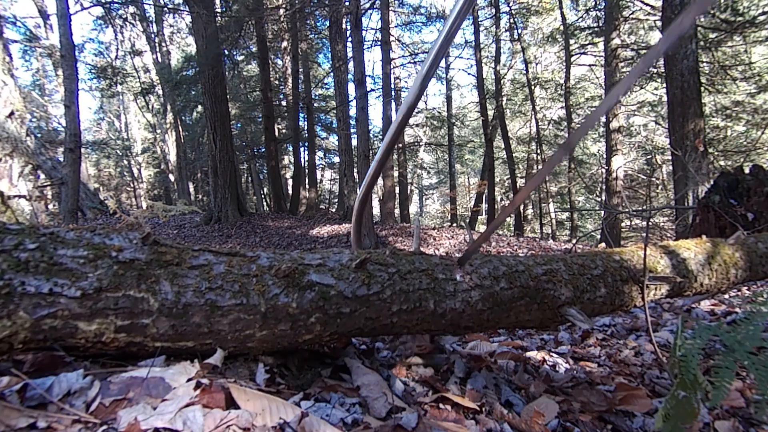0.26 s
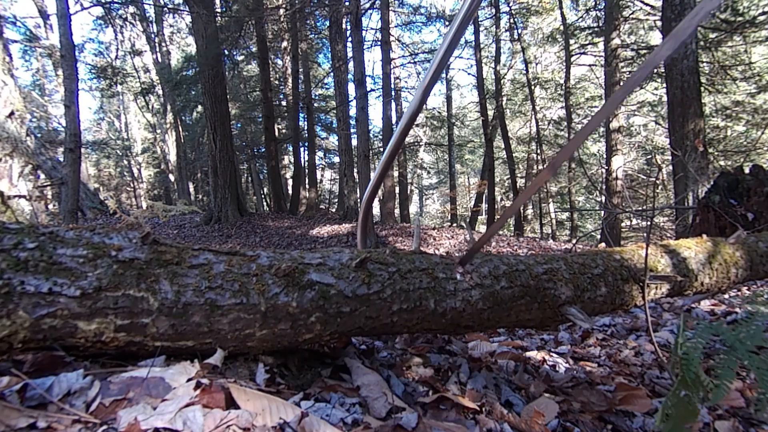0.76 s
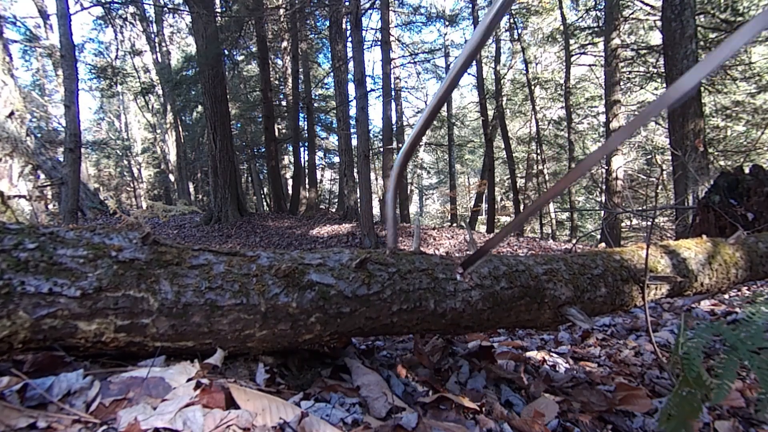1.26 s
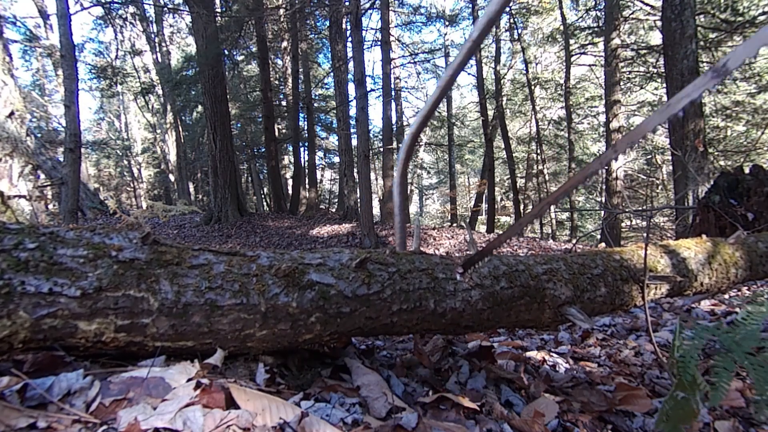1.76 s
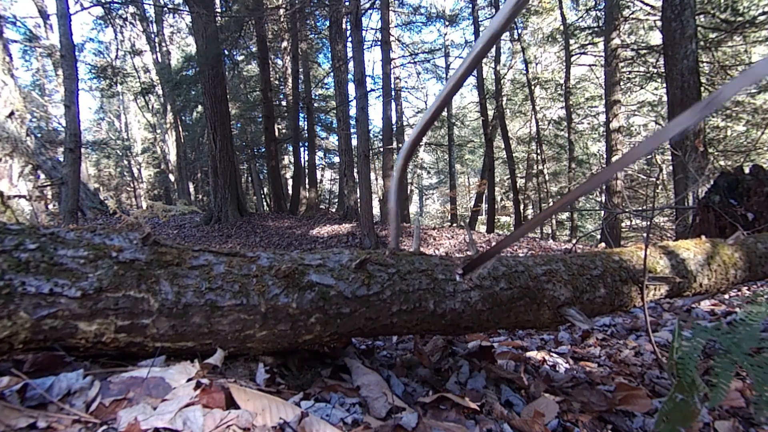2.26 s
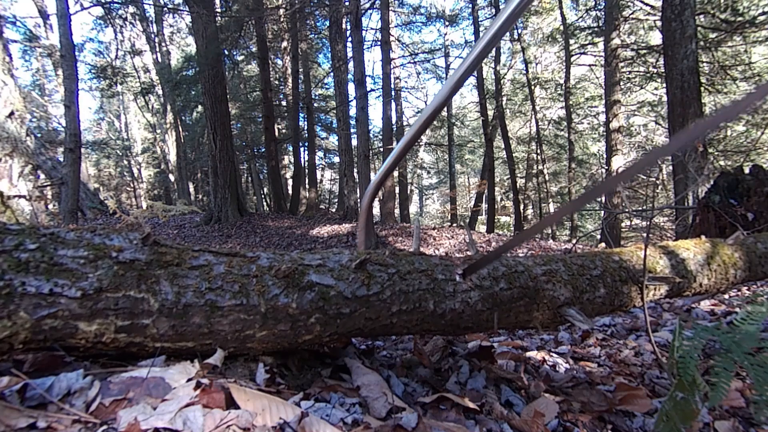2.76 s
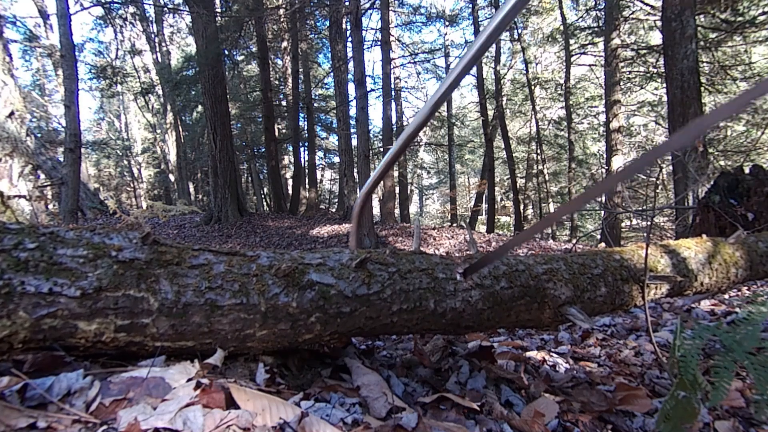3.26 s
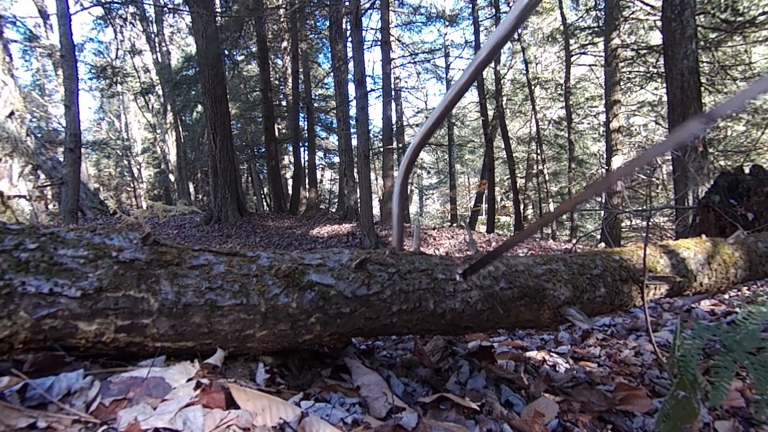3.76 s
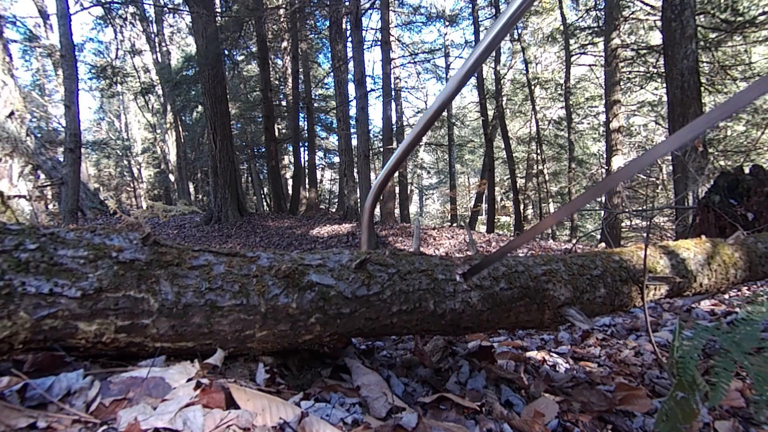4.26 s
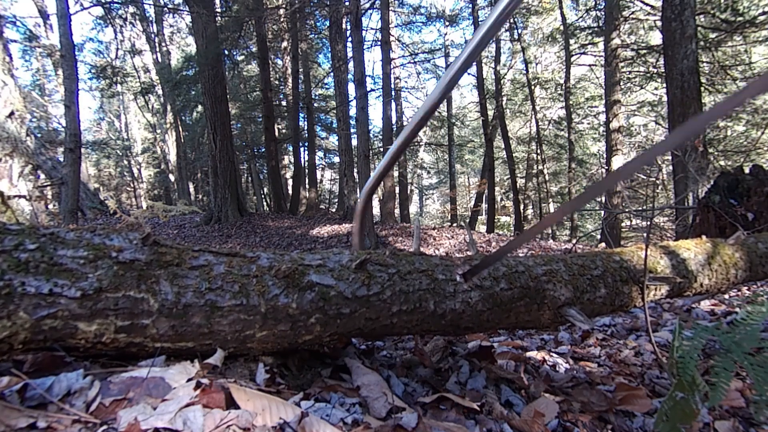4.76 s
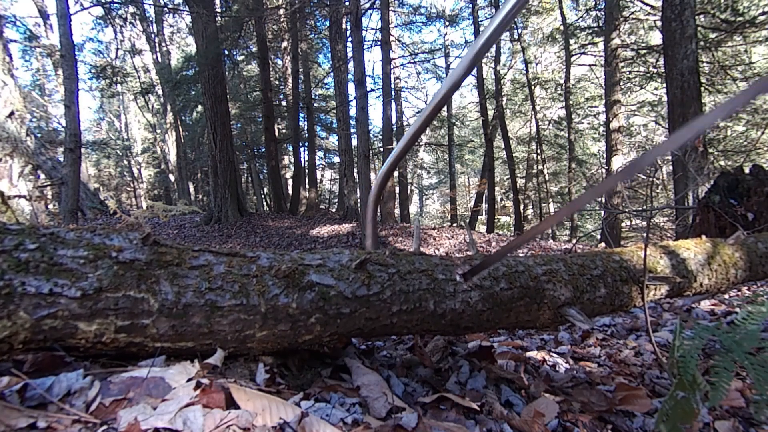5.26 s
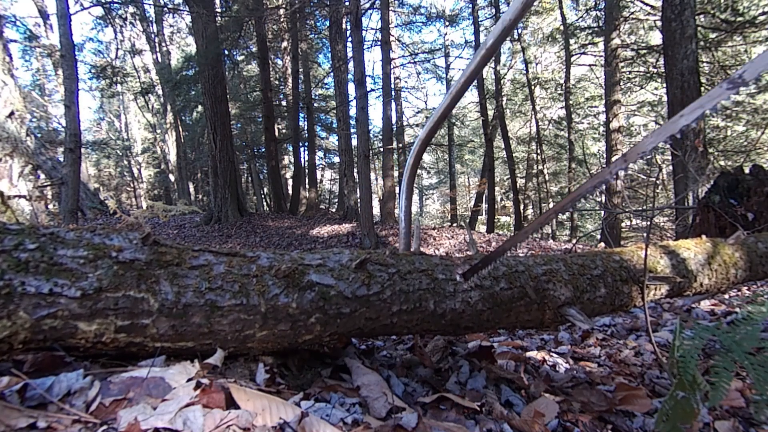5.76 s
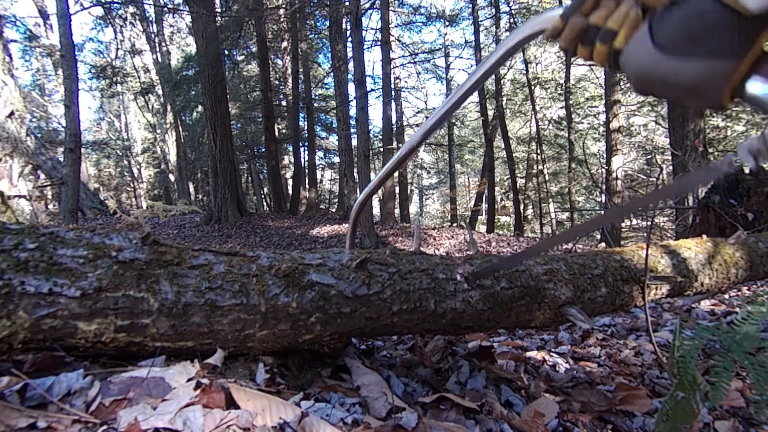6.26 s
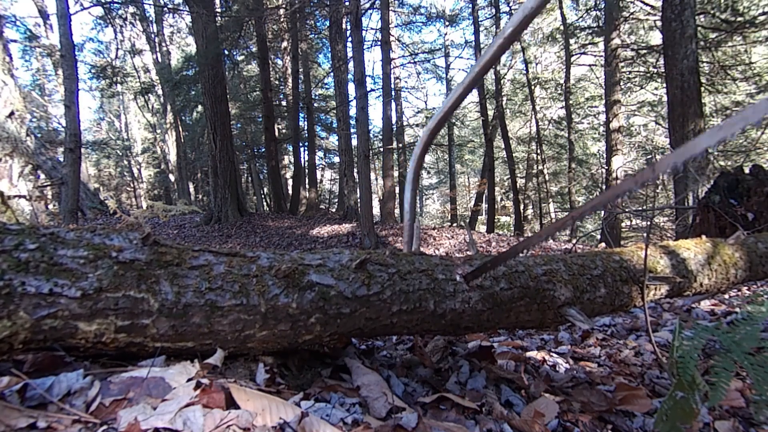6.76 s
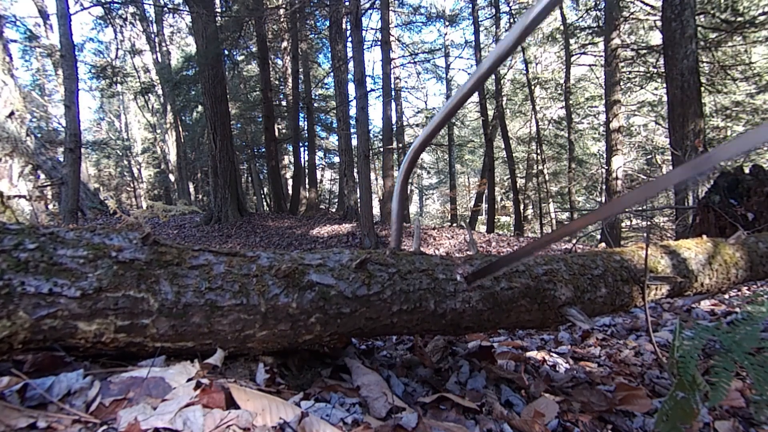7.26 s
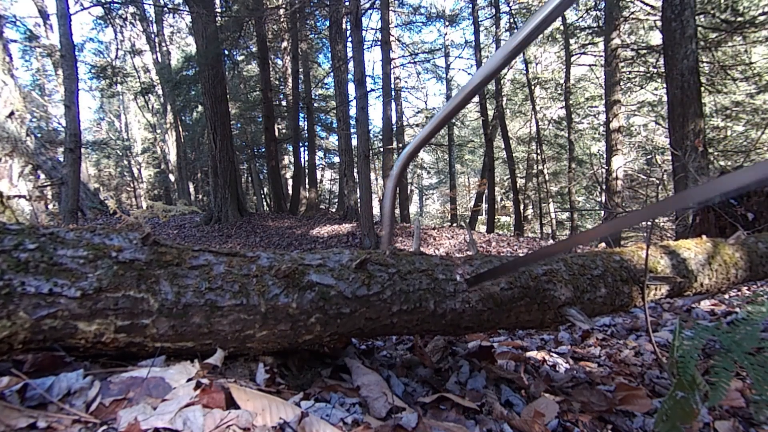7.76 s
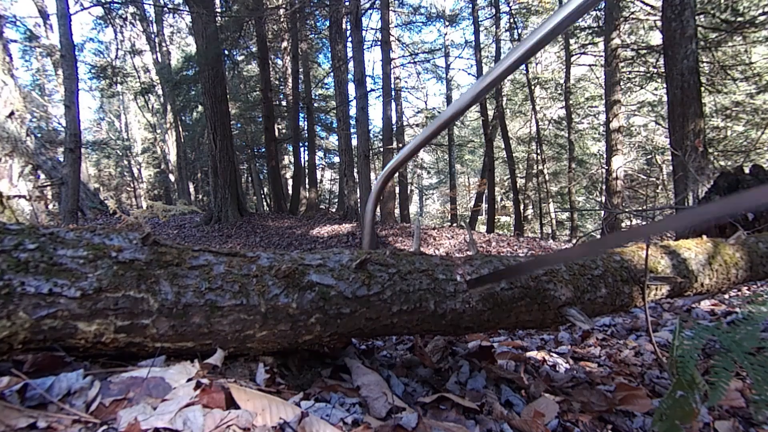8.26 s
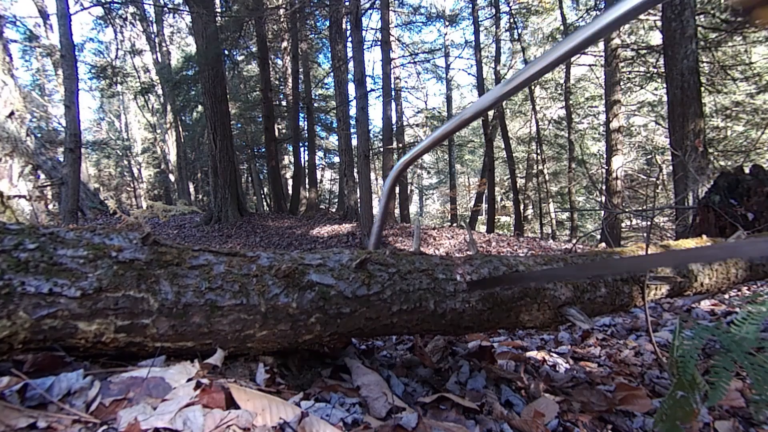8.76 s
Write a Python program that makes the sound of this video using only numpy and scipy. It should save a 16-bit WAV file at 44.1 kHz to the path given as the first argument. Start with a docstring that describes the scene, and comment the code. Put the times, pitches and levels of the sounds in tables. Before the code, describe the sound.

Very close to the microphone, a bow saw cuts a dead log in a quiet forest. Scratchy, uneven strokes come first, then a quick, forceful burst, then mostly longer rasping strokes, ending on a weak short one. The thin blade sizzles and rings, fibres snap, splinters crack, and the log thuds softly on the ground. Far leaves hiss faintly throughout.

```python
"""A bow saw cuts a dead log in a quiet forest, close by; far leaves hiss throughout, with faint tree echoes.
It opens full and scratchy with uneven strokes, turns quick and forceful from about 2 to 4 s, then mostly longer
strokes follow, some still strong, with three faint tooth hums, and a weak short one ends it. In each stroke
dense random grains tear the wood and make the thin steel blade sizzle, while tuned resonators let it ring;
decaying bursts snap fibres, sharp pulses crack splinters, and swells of low noise thud the log on the ground."""
import sys
import numpy as np
from scipy import signal
from scipy.fft import rfft, irfft, next_fast_len
from scipy.io import wavfile
from scipy.ndimage import uniform_filter1d, map_coordinates

SR = 44100
rng = np.random.default_rng(int(sys.argv[2]) if len(sys.argv) > 2 else 0)


def wav_out(sig):
    """Save sig, one row per channel (or a flat mono array), as 16-bit PCM at SR to the path in sys.argv[1]."""
    wavfile.write(sys.argv[1], SR, np.round(np.clip(np.atleast_2d(sig).T, -1, 1) * 32767).astype(np.int16))


def linear_from_db(decibels):
    """Turn decibels (scalar or array-like) into linear amplitude factors; 0 gives 1."""
    return 10 ** (np.asarray(decibels, float) / 20)


N = 397782  # length in samples, about 9 s

# Colour of the far leaves and air. Each row: frequency in Hz, relative level in dB per Hz.
FOREST_COLOUR = [(20, -2.5), (60, -3.5), (140, -8.5), (250, -9), (500, -10.5), (1000, -10), (1600, -16.5),
                 (2600, -6.5), (4000, -6), (6700, -31), (10300, -22), (15500, -44)]
FOREST_DB = -63.5  # middle level of the forest

# Tree trunks answer the saw. Each row: frequency in Hz, time to die by 60 dB in seconds.
TRUNK_DECAYS = [(500, 0.078), (3000, 0.17), (12000, 0.16)]

# The log thuds on the ground; each swell is at half its height at both ends.
# Each row: start in seconds, length in seconds, peak gain in dB.
LOG_THUDS = [(0.119, 0.21, -64), (0.656, 0.061, -57), (0.952, 0.039, -66), (1.055, 0.17, -65),
             (1.346, 0.042, -61), (1.55, 0.034, -65), (2.412, 0.026, -57), (2.821, 0.037, -65),
             (2.996, 0.106, -66), (3.205, 0.044, -58), (3.357, 0.025, -63), (3.55, 0.066, -61),
             (3.754, 0.09, -59), (4.14, 0.054, -64), (4.24, 0.17, -65), (4.816, 0.08, -65),
             (5.375, 0.069, -58.5), (6.099, 0.034, -68), (7.564, 0.06, -65), (7.791, 0.03, -67),
             (8.214, 0.083, -57), (8.436, 0.038, -65), (8.601, 0.032, -61)]
# Colour of the low shudder. Each row: frequency in Hz, relative level in dB per Hz.
GROUND_COLOUR = [(15, -36), (25, -16.5), (81, 1.5), (98, 1), (124, -19.5), (140, -11.5), (180, -33),
                 (310, -120)]
# Colour of the hollow knocking. Each row: frequency in Hz, relative level in dB per Hz.
HOLLOW_COLOUR = [(90, -48.5), (140, -1), (190, -4.5), (260, -9.5), (400, -32)]
SHUDDER_DB, KNOCK_DB = -73.5, -76  # middle levels of the constant trembling and knocking
KNOCK_UNDER_THUD_DB = -13.5  # knocking in each thud, against its shudder

# Passing teeth hum faintly for a moment.
# Each row: centre in seconds, length in seconds, highest pitch in Hz, peak amplitude in dB.
TOOTH_HUMS = [(5.183, 0.11, 195, -69), (6.02, 0.15, 191, -58), (8.849, 0.085, 173.5, -62)]

# Saw strokes, pushes and pulls in turn. Each row: start in seconds, length in seconds, relative tearing
# level at its top in dB, place of the top from 0 to 1, blade sizzle relative to the tearing in dB.
SAW_STROKES = [(-0.195, 0.32, -31.5, 0.12, -2.9), (0.068, 0.49, -35, 0.26, 1.5),
               (0.412, 0.29, -33.5, 0.77, 0.5), (0.678, 0.25, -37.5, 0.54, -0.5),
               (0.898, 0.23, -28.5, 0.73, 1.7), (1.061, 0.26, -36.5, 0.77, -2),
               (1.234, 0.31, -32.5, 0.99, 0.3), (1.526, 0.27, -38.5, 0.48, -4),
               (1.751, 0.24, -29, 0.69, -2.5), (1.966, 0.2, -35, 0.98, -4), (2.19, 0.22, -25, 0.65, -2.5),
               (2.397, 0.191, -30.5, 0.83, -3.5), (2.592, 0.23, -26.5, 0.68, -2.5),
               (2.799, 0.23, -37.5, 0.59, -3.1), (3.008, 0.24, -24, 0.38, -3.6),
               (3.218, 0.16, -22, 0.63, -2.5), (3.378, 0.21, -21.5, 0.42, -6), (3.561, 0.16, -21, 0.77, -7),
               (3.712, 0.23, -24, 0.53, -2.7), (3.917, 0.2, -29.0, 0.57, -5), (4.1, 0.27, -27, 0.4, -4.5),
               (4.346, 0.24, -32.9, 0.2, -3), (4.592, 0.25, -27, 0.69, -4), (4.83, 0.28, -36, 0.47, -3.5),
               (5.084, 0.33, -32, 0.67, -4), (5.397, 0.36, -39.5, 0.47, -2.5),
               (5.787, 0.37, -26, 0.53, -6.0), (6.197, 0.5, -36, 0.43, -4), (6.714, 0.32, -28, 0.66, -4.5),
               (7.038, 0.32, -33, 0.42, -5.5), (7.318, 0.291, -27.5, 0.73, -4),
               (7.594, 0.26, -30, 0.73, -7), (7.857, 0.33, -28.5, 0.48, -1.4), (8.098, 0.32, -22, 0.55, -5),
               (8.394, 0.317, -26.2, 0.68, -8.5), (8.68, 0.31, -34.5, 0.65, -4.5),
               (8.974, 0.11, -46, 0.4, -2)]
# Exponents of blade speed that give the power of tearing and of sizzle.
# The blade sizzles as soon as it slides, before the teeth bite.
TEAR_RISE_POWER, TEAR_FALL_POWER = 4.32, 3.67
SIZZLE_RISE_POWER, SIZZLE_FALL_POWER = 3.6, 3.02
RESTING_DB = -62.5  # relative tearing level of the faint contact at the turns

# The blade rubs the groove walls, strongest at the start and near 1.6 s, varying later.
# Each row: time in seconds, relative sizzle level in dB.
GROOVE_RUBBING = [(0, -52), (.7, -58), (1.6, -46), (2.4, -62), (3.4, -58), (4.4, -66), (5.4, -61),
                  (6.5, -67), (7.5, -58), (8.3, -58), (9, -65)]

# The teeth dig in (+) or slip (-) for a moment.
# Each row: centre in seconds, width at half height in seconds, change of the tearing in dB.
TOOTH_BINDS = [(0.252, 0.067, -5), (1.21, 0.022, 3.5), (1.317, 0.031, 6), (1.403, 0.037, -0.3),
               (1.47, 0.052, 7), (1.643, 0.015, 8), (2.074, 0.029, 8), (2.215, 0.016, 14),
               (2.498, 0.027, 6.5), (2.529, 0.027, -9.5), (2.902, 0.034, 11.5), (2.959, 0.012, -5),
               (2.969, 0.024, 11), (3.071, 0.029, -5.5), (3.2, 0.021, -18), (3.253, 0.017, -7),
               (3.271, 0.042, 3), (3.316, 0.02, -14.5), (3.44, 0.025, -10.5), (3.616, 0.017, -11.9),
               (3.642, 0.012, 4.5), (3.683, 0.02, -18), (4.238, 0.024, -4), (4.374, 0.014, 9),
               (4.387, 0.02, -10), (4.494, 0.02, 10), (4.625, 0.08, 8), (4.698, 0.03, -7),
               (5.176, 0.0097, 11.5), (5.496, 0.018, 9.5), (6.367, 0.016, -9), (6.433, 0.027, 5),
               (7.096, 0.026, -6.5), (7.125, 0.032, 5.5), (7.169, 0.021, -8.8), (7.372, 0.02, 10),
               (7.67, 0.015, -6.5), (7.699, 0.037, 12), (7.796, 0.014, -10), (7.879, 0.028, 17.5),
               (8.265, 0.035, -13), (8.333, 0.022, -11), (8.817, 0.025, 11.5), (8.913, 0.02, -8.5)]
SIZZLE_FOLLOWS = 0.96  # share of each bind's dB that the sizzle takes

# Teeth catch a fibre and rip it. Each row: time in seconds, relative force in dB, level of the rip's copy in
# the steel against the rip in dB.
FIBRE_SNAPS = [(0.1535, -13, -36), (0.229, -18, -21), (0.3326, -33, -2), (0.9354, -20.5, 2),
               (1.1503, -36, -15), (1.207, -18, -23), (1.32, -11.5, -19), (1.4646, -15, -15),
               (1.5906, -22, 2), (1.7814, -24, 3), (1.8228, -14.5, -4), (2.215, -24, 5), (2.2598, -29, -11),
               (2.4744, -9.5, -11), (2.5615, -11.5, -1), (2.6299, -24, -19), (2.883, -13, -7),
               (2.959, -10, -19), (3.0365, -20, -18), (3.0899, -14, -18), (3.2695, -12, -14),
               (3.3293, -6, -22), (3.4028, -20, -18), (3.6002, -22, -16), (3.634, -9, -4), (3.749, -9, -21),
               (3.9893, -12, -7), (4.1285, -15, -20), (4.2643, -1, -16), (4.2957, -3, -21),
               (4.371, -16, -14), (4.406, -11, -19), (4.6334, -11, -23), (4.79, -6, -22), (5.1417, -24, -2),
               (5.1741, -22, -22), (5.3505, -8.5, -7), (5.3804, -10, -10), (5.4899, -24, -11),
               (5.893, -13, -24), (6.0252, -15, -22), (6.2654, -23, -22), (6.3574, -9.5, -13),
               (6.3909, -29, -11), (6.4178, -19, -14), (6.776, -26, 0), (6.8326, -15, -9),
               (7.0765, -16.5, -28), (7.1177, -15, -29), (7.3572, -22, -4), (7.6877, -9, -10),
               (7.763, -5, -25), (7.8725, -29, -6), (8.2821, -7, -27), (8.4694, -17, 0), (8.5217, -5, -22),
               (8.561, -6, -22), (8.735, -24, -8), (8.8019, -14, -13), (8.8682, -11, -16)]
RIP_T60_S = 0.053

# Dry splinters crack very briefly, some alone and some at the start of a fibre's rip.
# Each row: time in seconds, relative force in dB.
SPLINTER_CRACKS = [(.1556, -21), (.231, -13), (.2864, -24), (.3338, -18), (.8135, -21), (1.2097, -17),
                   (1.2693, -23), (1.4655, -11), (1.8497, -20), (3.0373, -21), (3.4755, -12), (3.495, -10),
                   (3.5416, -17), (3.6435, -10), (3.7505, -21), (4.1341, -22), (4.194, -16), (4.265, -9),
                   (4.298, -14), (4.7928, -14), (5.3526, -15), (5.894, -17), (6.0275, -14), (6.0651, -18),
                   (7.1185, -9), (7.7196, -13), (8.5245, -14), (8.5625, -13), (8.5815, -14), (8.6095, -14),
                   (8.7977, -21), (8.8958, -24)]
CRACK_T60_S, CRACK_FORCE_DB, CRACK_TREBLE_DB = .002, -3, -7  # decay, trim on the force, share sent to the steel

# Colour of the torn wood. Each row: frequency in Hz, relative level in dB per Hz.
WOOD_COLOUR = [(350, -74.5), (600, -37), (1210, -26), (1550, -17), (1730, -15.5), (2020, -9.5),
               (2180, -6.5), (2530, -1), (2780, -2), (3050, 0), (3890, -9.5), (4420, -5), (7500, -18),
               (9750, -20.5), (16500, -120)]
# Colour of the sizzling steel, where a small housing close by favours two treble ranges.
# Each row: frequency in Hz, relative level in dB per Hz.
STEEL_COLOUR = [(3800, -33.5), (6500, -43.5), (7300, -12), (8500, -6.5), (9700, 2.5), (10400, 6),
                (11700, -1.5), (12400, -5), (13000, -0.5), (13750, -14), (14800, -15), (15500, -12),
                (16000, -6)]

# Ringing modes of the blade and its tube frame.
# Each row: frequency in Hz, width in Hz, relative level in dB, scale of the random pitch drift in percent.
BLADE_MODES = [(1540, 60, -19, 1.5), (2055, 25, -7, .4), (2450, 40, -4, 1.5), (2620, 35, -4, 1.5),
               (2990, 35, -3, 1.2), (3120, 45, -1, 1.2), (3230, 40, -5, 1.2), (3720, 50, -12, 1.5),
               (4420, 40, -8, 1.2), (4520, 45, -6, 1.2), (5300, 60, -14, 1.5), (5950, 60, -17, 1.2),
               (10210, 60, -6, .7), (10730, 60, -8, .5), (12000, 150, -13, .5), (12580, 70, -11, .1),
               (12830, 35, -10, .05), (13290, 100, -12, .1), (13515, 30, -15, .05), (14160, 150, -17, .1)]

# The tone drifts as the groove deepens and the blade tilts.
# Each row: time in seconds, boost of the hollow low end in dB, boost of the scratchy range in dB.
CUT_TONE = [(0, 5.5, 5), (1, 5, 4.5), (1.6, -0.5, 2.5), (2.6, 4, 1), (3.5, 0, -1.5), (5.3, 3.5, -0.5),
            (7, 0, -0.5), (8.2, 1, -2), (9, 4.5, 0.5)]

TOP_HZ = 15760  # band limit of the camera


def unit(x):
    """Scales a signal to rms 1."""
    return x / np.sqrt(np.mean(x ** 2) + 1e-20)


def along(points, hz):
    """Reads (Hz, value) points on a log frequency axis."""
    f, v = np.transpose(points)
    return np.interp(np.log(hz + 1), np.log(f + 1), v)


def curves(rows):
    """Draws one value per sample for each column after the time."""
    s, *cols = np.transpose(sorted(map(tuple, rows)))
    return [np.interp(np.arange(N) / SR, s, c) for c in cols]


def wobble(rate):
    """Draws a smooth random curve with this many knots a second, 400 at most."""
    knots = rng.standard_normal(int(N * 400 / SR) + 4)
    return map_coordinates(knots, [np.arange(N) * min(rate, 400) / SR])


def filtered(x, response):
    """Multiplies the spectrum of x by a response of frequency."""
    m = 2 * next_fast_len(N // 2 + 8192)
    return irfft(rfft(x, m) * response(np.fft.rfftfreq(m, 1 / SR)), m)[:N]


def causal(spectrum):
    """Makes a minimum-phase response of this colour, so that clicks start sharply."""
    def response(hz):
        cepstrum = irfft(np.log(linear_from_db(along(spectrum, hz)) + 1e-6))
        cepstrum[1:len(hz) - 1] *= 2
        cepstrum[len(hz):] = 0
        return np.exp(rfft(cepstrum))
    return response


def coloured_noise(spectrum):
    """Shapes white noise to a colour at rms 1."""
    return unit(filtered(rng.standard_normal(N), causal(spectrum)))


def forest():
    """Far leaves and air: steady coloured noise, slowly breathing."""
    air = coloured_noise(FOREST_COLOUR)
    return linear_from_db(FOREST_DB + 0.8 * wobble(4.6)) * air


def trunks(x):
    """Tree echoes: a noise tail in which each frequency dies at its own speed."""
    hz, t, z = signal.stft(rng.standard_normal(SR // 2), SR, nperseg=256)
    decay = linear_from_db(-60 * t / along(TRUNK_DECAYS, hz)[:, None])
    tail = signal.istft(z * decay, SR, nperseg=256)[1]
    delayed = np.pad(x, (300, 0))  # 300 samples, about 7 ms
    return signal.fftconvolve(delayed, tail / np.linalg.norm(tail))[:N]


def log_on_ground():
    """The log: swells of low noise as it shudders and thuds, with hollow knocking over them."""
    t = np.arange(N) / SR
    thuds = np.zeros(N)
    for s, length, db in LOG_THUDS:
        at = slice(max(round((s - length) * SR), 0), round((s + 2 * length) * SR))
        thuds[at] += linear_from_db(db) * .5 ** ((2 * (t[at] - s - length / 2) / length) ** 2)
    shudder = thuds + linear_from_db(SHUDDER_DB + 3.7 * wobble(7.1))
    rumble = shudder * coloured_noise(GROUND_COLOUR)
    knocks = linear_from_db(KNOCK_UNDER_THUD_DB) * thuds + linear_from_db(KNOCK_DB + 3.4 * wobble(15))
    return rumble + knocks * coloured_noise(HOLLOW_COLOUR)


def tooth_hum():
    """Passing teeth: a sine at their rate, highest and loudest in the middle of each hum."""
    t = np.arange(N) / SR
    hum = np.zeros(N)
    for s, length, top_hz, db in TOOTH_HUMS:
        u = np.clip((t - s) / length, -.5, .5)
        turns = np.cumsum(top_hz * (1 - .6 * u ** 2)) / SR
        hum += linear_from_db(db) * np.cos(np.pi * u) * np.sin(2 * np.pi * turns)
    return hum


def strokes():
    """Blade motion: speed rises to a top and falls to the turn, driving the gains of tearing and sizzle."""
    t = np.arange(N) / SR
    tear_power = np.full(N, linear_from_db(RESTING_DB) ** 2)
    sizzle_power = linear_from_db(curves(GROOVE_RUBBING)[0]) ** 2
    change_db = np.zeros(N)
    for s, length, db in TOOTH_BINDS:
        at = slice(max(round((s - 2 * length) * SR), 0), round((s + 2 * length) * SR))
        change_db[at] += db * .5 ** ((2 * (t[at] - s) / length) ** 2)
    for s, length, db, top, sizzle_db in SAW_STROKES:
        at = slice(max(round(s * SR), 0), round((s + length) * SR))
        u = np.clip((t[at] - s) / length, 0, 1)
        speed = np.sin(np.pi / 2 * np.minimum(u / top, (1 - u) / (1 - top)))
        tear_power[at] += linear_from_db(db) ** 2 * speed ** np.where(u < top, TEAR_RISE_POWER, TEAR_FALL_POWER)
        sizzle_exponent = np.where(u < top, SIZZLE_RISE_POWER, SIZZLE_FALL_POWER)
        sizzle_power[at] += linear_from_db(db + sizzle_db) ** 2 * speed ** sizzle_exponent
    return np.sqrt(tear_power) * linear_from_db(change_db), np.sqrt(sizzle_power) * linear_from_db(SIZZLE_FOLLOWS * change_db)


def jolts(per_s, decay_s):
    """Uneven bite: small quick catches, as a gain of rms 1."""
    kicks = (rng.random(N) < per_s / SR) * np.minimum(rng.exponential(size=N), 3.2)
    fade = [1, -np.exp(-1 / (decay_s * SR))]
    # two decays in a row: each swell rises, then dies
    swells = signal.lfilter([1 + fade[1]], fade, signal.lfilter([np.e], fade, kicks))
    return unit(.5 + 0.17 * swells)


def grains(per_s, spread_db, dust):
    """Tooth contacts: clicks at random moments, some larger than most, over fine dust."""
    hit = rng.random(N) < per_s / SR
    size = linear_from_db(spread_db * np.minimum(rng.exponential(size=N), 2.6)) * rng.choice([-1, 1], N)
    return unit(unit(hit * size) + dust * rng.standard_normal(N))


def patchy(x, depth_db, bins, frames):
    """Moving contact: the colour drifts in patches as the point of contact moves along the blade."""
    z = signal.stft(x, nperseg=256)[2]
    field = uniform_filter1d(rng.standard_normal(z.shape), bins, 0)
    field = uniform_filter1d(field, frames, 1)
    return unit(signal.istft(z * linear_from_db(depth_db * unit(field)), nperseg=256)[1][:N])


def snap_fibres(low, high, bites, scratches):
    """Fibres: adds a click and a decaying rip of grains of one size to the wood and steel forces."""
    t = np.arange(SR // 10) / SR
    for s, db, treble_db in FIBRE_SNAPS:
        at = slice(round(s * SR), round(s * SR) + len(t))
        click = linear_from_db(db + 6.0) * (t == 0)
        rip = (linear_from_db(db - 23.5 - 60 * t / RIP_T60_S) + click)[:len(low[at])]
        give = 1.3 - np.exp(-t[:len(rip)] / 0.0014)  # the wood takes a moment to give
        low[at] += rip * give * np.sign(bites[at])
        high[at] += linear_from_db(treble_db + 1.5) * rip * np.sign(scratches[at])


def crack_splinters(low, high, scratches):
    """Splinters: adds very short 3 kHz pulses to the wood force, and their scratchy copies to the steel."""
    t = np.arange(SR // 10) / SR
    for s, db in SPLINTER_CRACKS:
        at = slice(round(s * SR), round(s * SR) + len(t))
        crack = linear_from_db(db + CRACK_FORCE_DB - 60 * t / CRACK_T60_S) * np.cos(2 * np.pi * 3000 * t)
        low[at] += crack
        high[at] += linear_from_db(CRACK_TREBLE_DB) * crack * np.sign(scratches[at])


def blade(force):
    """Blade modes: each rings with its own share, bending in pitch as free length and tension change."""
    ring = np.zeros(N)
    for hz, width, db, drift in BLADE_MODES:
        share = linear_from_db(db) * unit(linear_from_db(3.6 * wobble(30)))
        turn = np.exp(2j * np.pi * np.cumsum(hz * (1 + drift / 100 * wobble(7))) / SR)
        keep = np.exp(-np.pi * width / SR)
        # a one-pole decay around the moving pitch is a resonator
        ring += 2 * np.real(turn * signal.lfilter([1 - keep], [1, -keep], share * force / turn))
    return filtered(ring, lambda f: 1 / (1 + (1350 / (f + 1)) ** 6))  # the ringing is kept out of the bass


def toned(x):
    """Tone of the cut: raises or lowers the hollow low end and the scratchy range over time."""
    hollow_db, scratch_db = curves(CUT_TONE)
    hollow = filtered(x, lambda hz: 1 / (1 + (hz / 1900) ** 8))
    scratch = filtered(x, lambda hz: 1 / (1 + (3900 / (hz + 1)) ** 8) / (1 + (hz / 7500) ** 8))
    return x + (linear_from_db(hollow_db) - 1) * hollow + (linear_from_db(scratch_db) - 1) * scratch


def saw():
    """Saw: teeth tear the wood, and the same contacts shake the blade, whose modes ring on a little."""
    tear, sizzle = strokes()
    bite = jolts(260, 0.0011) * unit(linear_from_db(0.42 * wobble(35)))
    bites = grains(1800, spread_db=0.5, dust=1.0)
    scratches = unit(0.33 * bites + grains(4000, spread_db=0.8, dust=1.0))
    low = linear_from_db(-0.52) * tear * bite * patchy(bites, 3.14, bins=3, frames=9)
    slide = unit(bite ** 0.63 * linear_from_db(0.62 * wobble(60)))  # the sizzle follows the bite more gently
    high = linear_from_db(-0.77) * sizzle * slide * patchy(scratches, 4.3, bins=4, frames=9)
    snap_fibres(low, high, bites, scratches)
    crack_splinters(low, high, scratches)
    probe = rng.standard_normal(N)

    def through(force, colour):
        """Colours a force, with the gain set so that white noise keeps its level."""
        return filtered(force, colour) / np.std(filtered(probe, colour))

    shake = (low + high) * rng.choice([-1, 1], N)  # sideways force: as strong as the cut, unrelated in sign
    wood = linear_from_db(-1.5) * through(low, causal(WOOD_COLOUR))
    steel = through(high, causal(STEEL_COLOUR))
    return toned(wood + steel + linear_from_db(12.5) * blade(shake))


def scene():
    """Mixes saw, tree echoes, log, tooth hum and forest to one channel."""
    cut = saw()
    echoes = linear_from_db(-22) * trunks(cut)
    return (cut + echoes + log_on_ground() + tooth_hum() + forest())[None]


def roll_off(x):
    """The treble ends steeply here."""
    return signal.sosfilt(signal.butter(12, 16460, fs=SR, output="sos"), x)


def record(dry):
    """The camera keeps nothing above its band limit."""
    mix = filtered(dry[0], lambda hz: hz < TOP_HZ)[None]
    return roll_off(mix)


dry = scene()
out = record(dry)
wav_out(out)
```